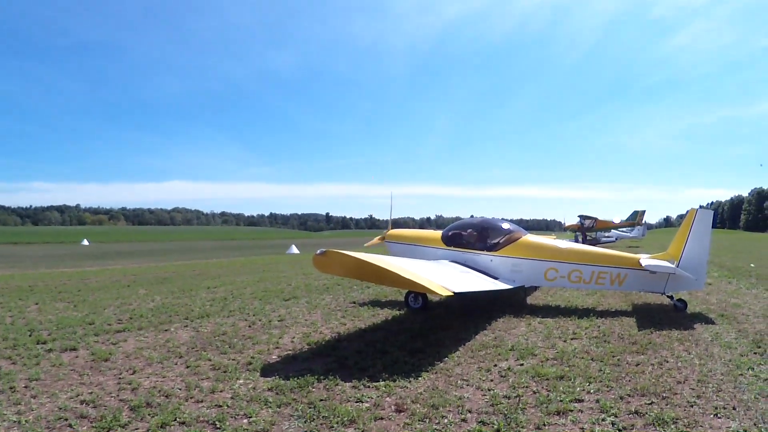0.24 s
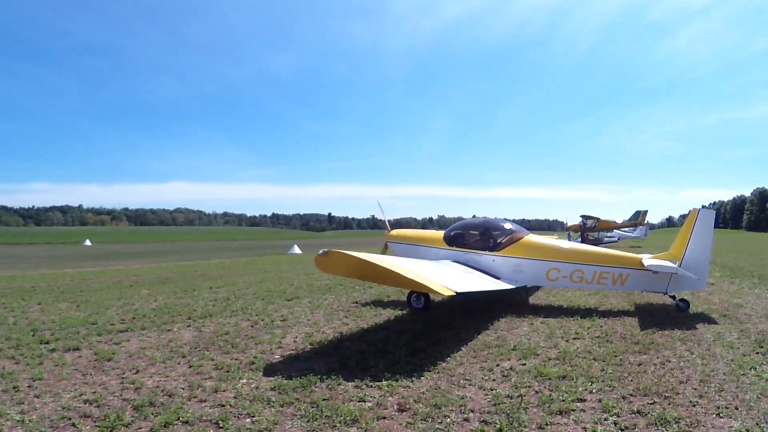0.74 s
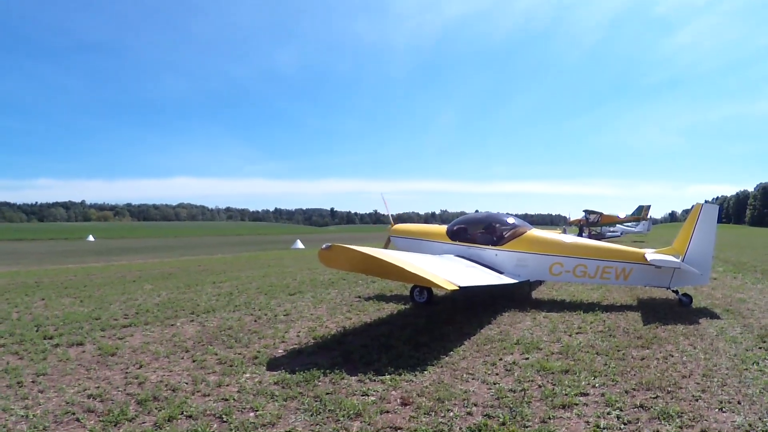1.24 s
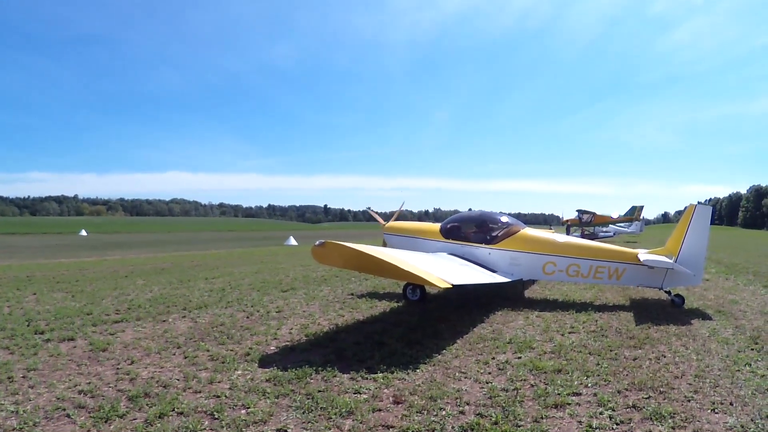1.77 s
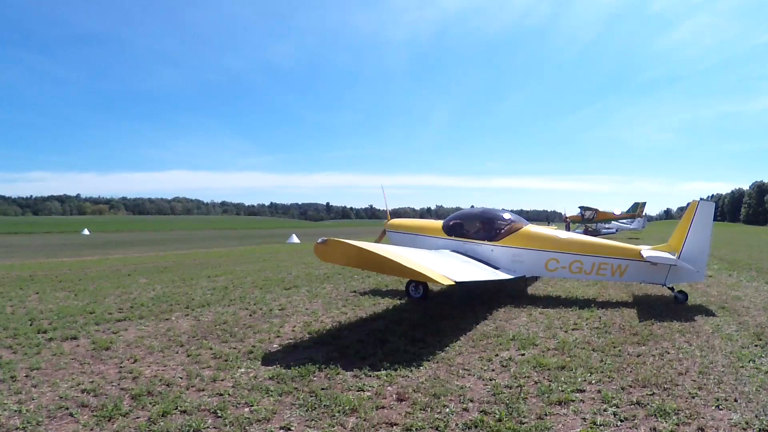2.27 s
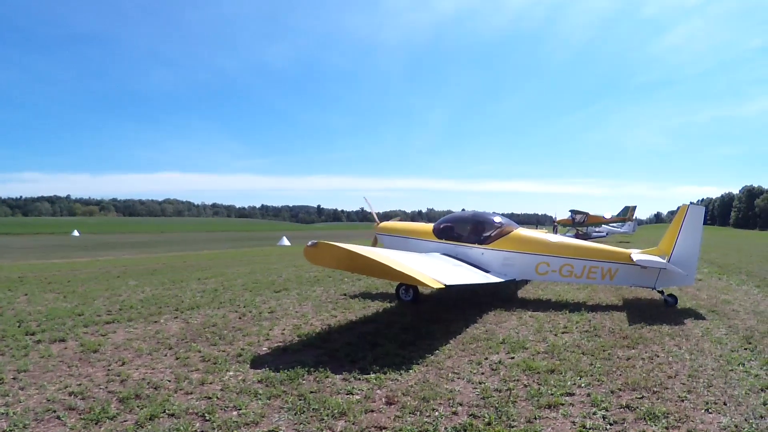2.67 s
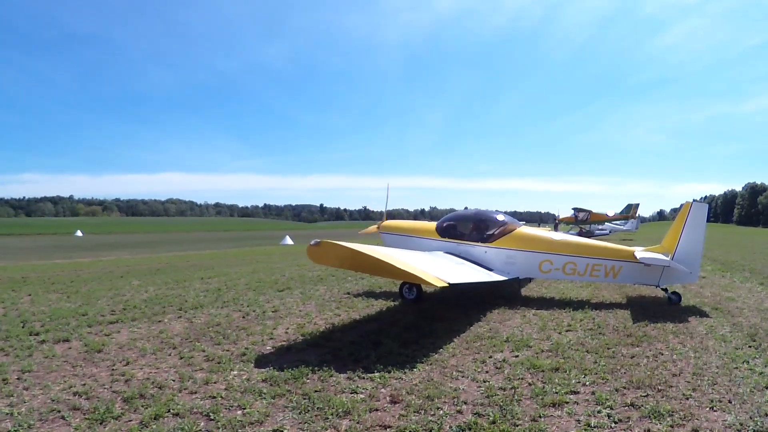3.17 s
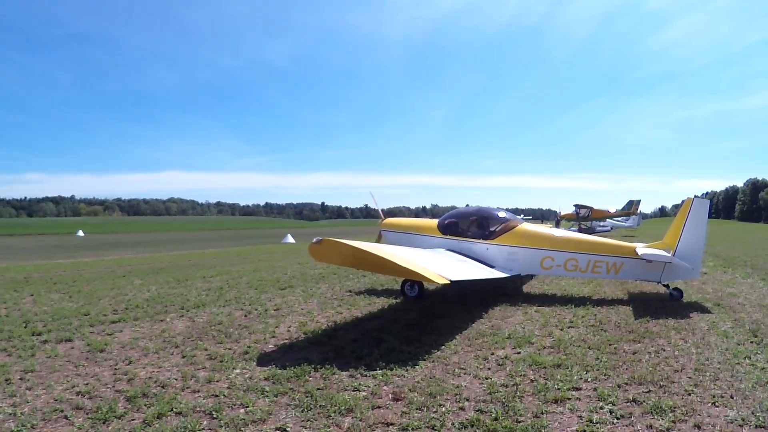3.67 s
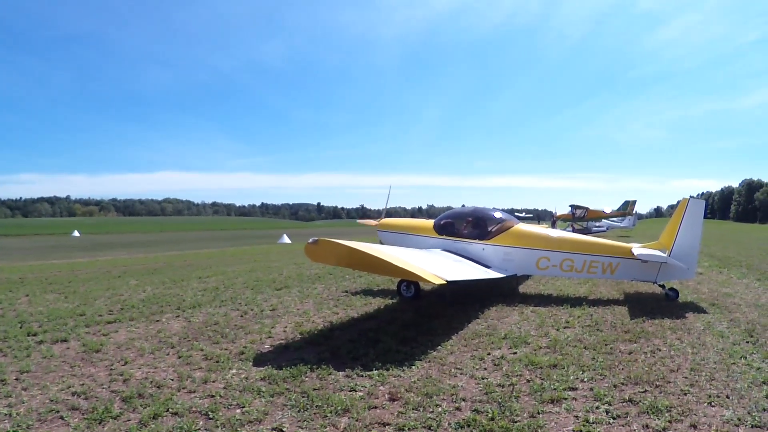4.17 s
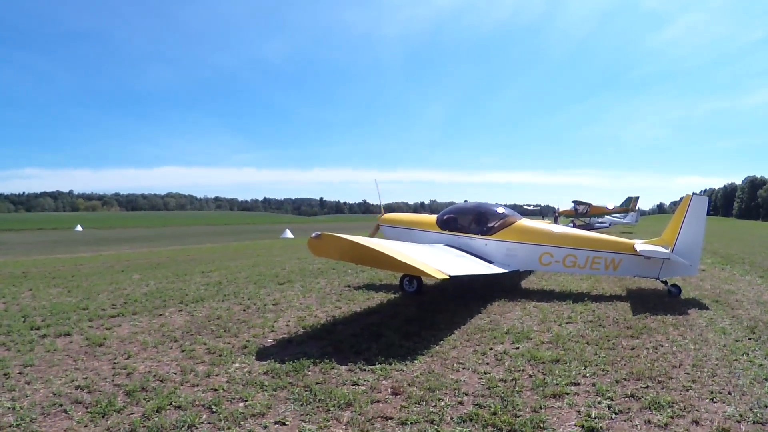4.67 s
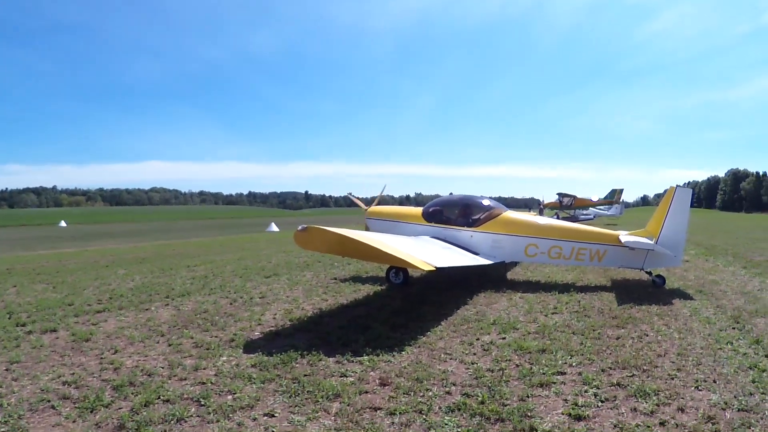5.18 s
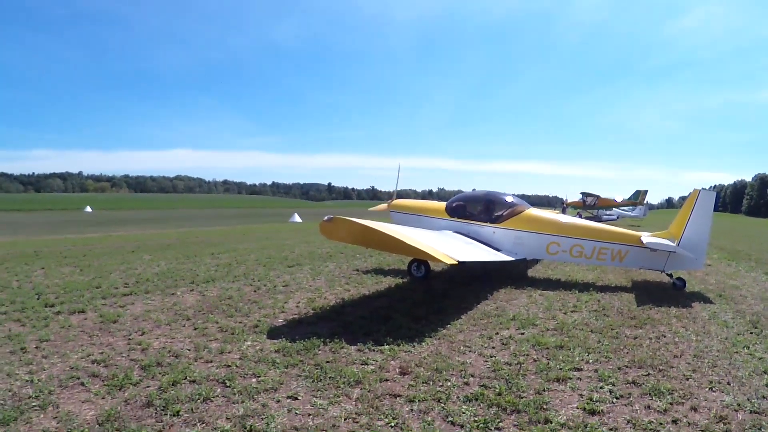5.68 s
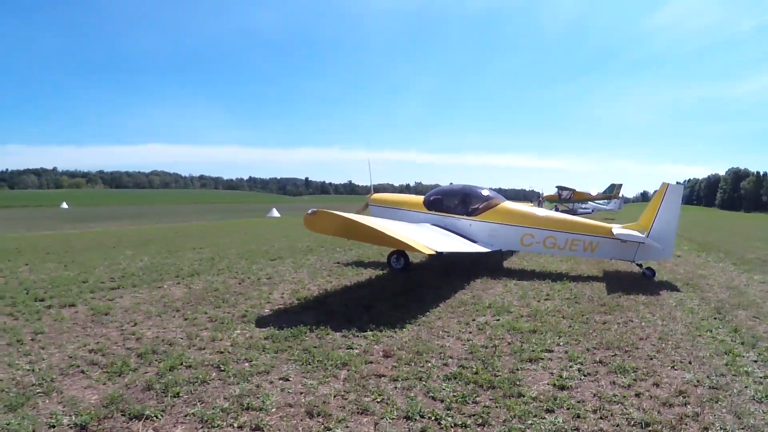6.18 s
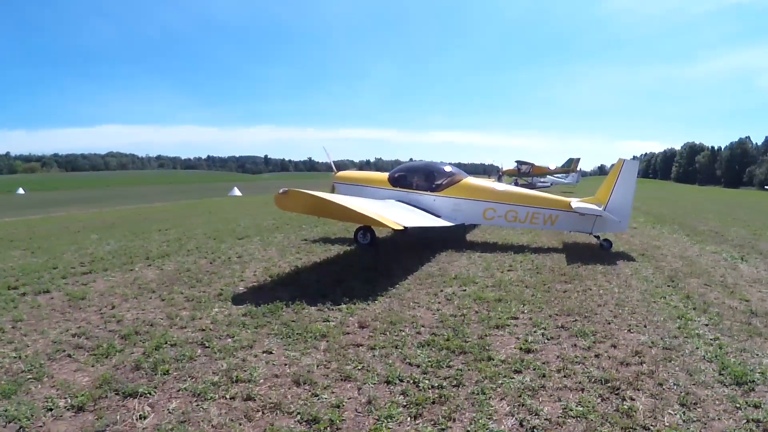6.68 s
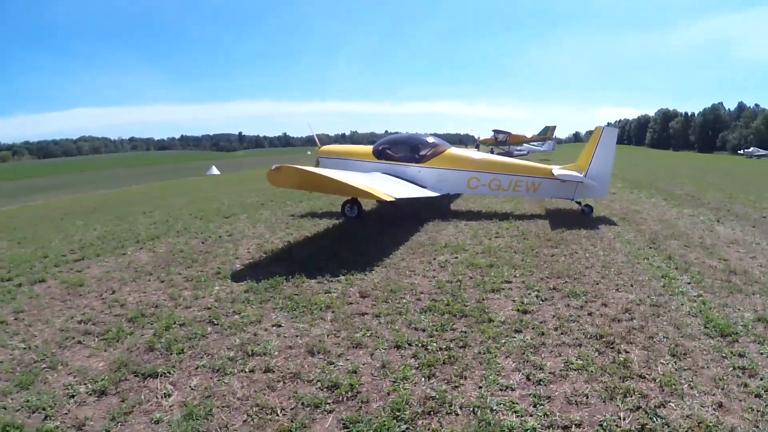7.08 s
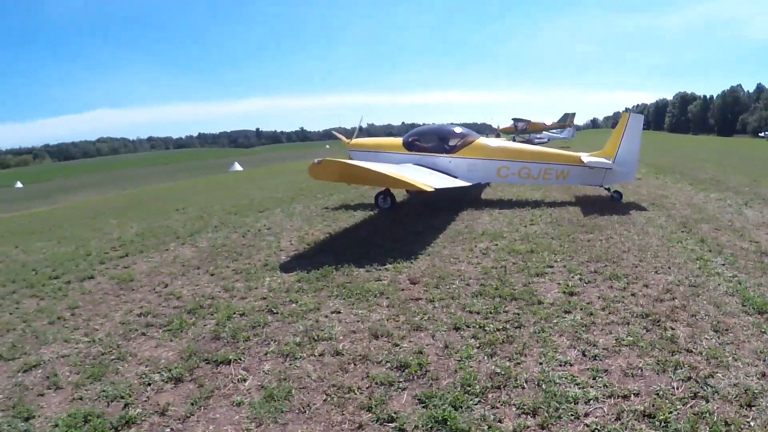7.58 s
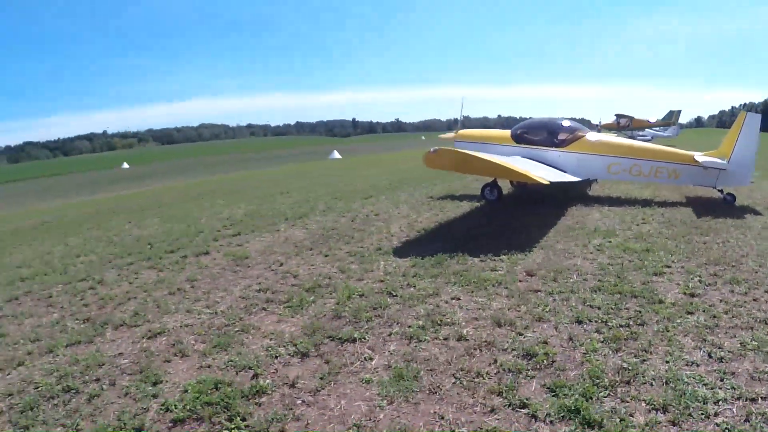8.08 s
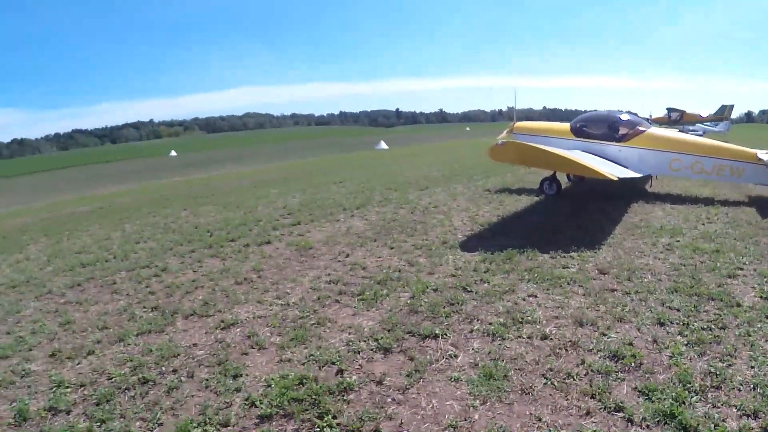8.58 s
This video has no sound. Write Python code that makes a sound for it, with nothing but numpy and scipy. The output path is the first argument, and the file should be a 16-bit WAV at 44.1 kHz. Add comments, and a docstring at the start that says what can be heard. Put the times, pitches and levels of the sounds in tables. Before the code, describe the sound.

A light piston aircraft idles on an open grass field, heard from the side a few metres off, continuous for nearly nine seconds. From 0 s a deep exhaust drone around 67 firings per second is slightly rough and burbling, quickening over the first two seconds to about 71 and then creeping barely higher. A faint far engine beats against it, the throb slowing and fading by about 2 s. Over the drone, propeller blades chop at nearly 50 per second with low puffs, sharp slaps and airy swishes that swell irregularly; fine metallic valve ticks, gear rattle and high fluttering hiss fill the top. Around 5 to 6 s the microphone moves aside and the drone and ticking soften slightly while the low blade thrum grows. From 7.3 s it swings away, the ground echo shifting the swish's colour, and short low wind buffets arrive from about 8 s. The engine never stops.

```python
"""A light aircraft idles on a grass airfield, heard from the side, a few metres off; a second one idles farther back.
The near four-cylinder engine gathers speed just after starting, so its throb against the far one slows and fades.
Firing tones drone, filtered noise bursts tick as valve gear, and a geared three-blade propeller chops the air
as pulses and gated noise. Near the end the microphone swings away, which shifts the ground echo; a little wind
buffets it as low noise."""
import sys
import numpy as np
from scipy import signal
from scipy.fft import rfft, irfft, next_fast_len
from scipy.io import wavfile

SR = 44100
rng = np.random.default_rng(int(sys.argv[2]) if len(sys.argv) > 2 else 0)


def file_out(sig):
    """Save sig as 16-bit WAV at sys.argv[1]."""
    # one column per channel
    cols = np.atleast_2d(sig).T
    # limit, then scale
    lim = np.clip(cols, -1, 1)
    pcm = np.round(lim * 32767).astype(np.int16)
    wavfile.write(sys.argv[1], SR, pcm)


N = 389403


def from_db(db):
    """Decibels to gain."""
    return 10 ** (np.asarray(db) / 20)


def rms_one(x):
    """Scale to unit power."""
    return x / np.sqrt(np.mean(x ** 2) + 1e-20)


def in_time(rows):
    """Each column of a curve, at every sample."""
    time_s, *columns = np.transpose(rows)
    return [np.interp(np.arange(N) / SR, time_s, column) for column in columns]


def at_bins(points):
    """A table over log frequency, read at every bin."""
    hz, value = np.transpose(points)
    bin_hz = np.fft.rfftfreq(next_fast_len(N), 1 / SR)
    return np.interp(np.log(bin_hz + 1), np.log(hz), value)


def shape(x, gain):
    """Filter with one gain per bin."""
    size = next_fast_len(N)
    return irfft(rfft(x, size) * gain, size)[..., :N]


def drift(rate_hz):
    """Slow chance with a spread of 1: noise through two equal poles, drawn every 40 samples."""
    r = np.exp(-2 * np.pi * rate_hz * 40 / SR)
    noise = rng.standard_normal(N // 40 + 2002)
    slow = signal.lfilter([1], [1, -2 * r, r * r], noise)[2000:]  # settled part
    return np.interp(np.arange(N) / 40, np.arange(len(slow)), rms_one(slow))


# Likeness of the two microphone ports. Each row: frequency in Hz, left-right likeness (0-1).
PORT_LIKENESS = [(200, .99), (500, 0.83), (1200, 0.98), (2500, 0.98), (4000, 1), (8000, 0.81),
                 (13000, 0.84)]


def air():
    """White noise at both ports, their likeness varying with frequency."""
    alike = np.clip(at_bins(PORT_LIKENESS), 0, 1)
    mid, side = rng.standard_normal((2, N))
    return shape(mid, np.sqrt(1 + alike)) + shape(side, np.sqrt(1 - alike)) * [[1], [-1]]


def colour(x, spectrum):
    """Filter x by a table of gains in dB; unit power."""
    return rms_one(shape(x, from_db(at_bins(spectrum))))


def resonate(x, hz, width_hz):
    """A resonance with gain 1 on top."""
    r = np.exp(-np.pi * width_hz / SR)
    zeros = np.array([1, 0, -1]) * (1 - r * r) / 2
    poles = [1, -2 * r * np.cos(2 * np.pi * hz / SR), r * r]
    return signal.lfilter(zeros, poles, x)


def ring(force, modes):
    """A metal casing answers a force with its resonances, alternating in sign; unit power."""
    total = 0
    for k, (hz, width_hz, db) in enumerate(modes):
        total += (-1) ** k * from_db(db) * resonate(force, hz, width_hz)
    return rms_one(total)


def pan(x, balance_db):
    """Lean left (positive) or right, keeping the centre level."""
    gains = from_db(balance_db * np.array([[1], [-1]]) / 2)
    return x * gains / gains.mean(axis=0)


def strengths(turns, spread_db):
    """A new random gain for every whole turn."""
    turn = np.floor(turns - np.floor(turns.min())).astype(int)
    return from_db(spread_db * rng.standard_normal(size=2048))[turn]


def swell(turns, width):
    """A rounded peak in the middle of every turn."""
    return 1 / (1 + (np.cos(np.pi * turns) / (np.pi * width)) ** 2)


def bump(at_s, length_s):
    """A smooth rise and fall of height 1; its length is taken at half height."""
    return .5 ** ((2 * (np.arange(N) / SR - at_s) / length_s) ** 2)


def ground_echo(x, delay_ms, strength):
    """The grass returns a late, weaker copy that combs the sound; unit power."""
    now = np.arange(N)
    then = now - delay_ms * SR / 1000
    late = np.array([np.interp(then, now, side) for side in x])
    return rms_one(x + strength * late)


# Near engine speed. Each row: time in s, firings per s.
FIRING_HZ = [(0, 66.95), (.48, 68.08), (.87, 69.67), (1.6, 70.11), (2.25, 71.06), (4.6, 71.45),
             (5.1, 71.63), (7, 72.18), (7.4, 71.85), (8.83, 72.5)]
# Microphone, carried aside, then swung away. Each row: time in s, way aside (0-1), swing (0-1).
MICROPHONE_PATH = [(5.1, 0, 0), (6.2, .9, 0), (7.3, 0.7, 0.2), (8.1, 0.45, 1)]
# Layer levels before each layer's own trim. Each entry: dB at idle, dB more per extra firing per s,
# dB change once aside, dB change once swung away.
LAYER_DB = {"tone": (-11, 0.48, -1.2, -0.5), "overtones": (-18.5, 0.54, -1.63, -1.5),
            "thrum": (-38.5, -0.2, 2.5, 1.5), "swish": (-35, 0.6, -0.94, -0.6),
            "valves": (-37.5, 0.1, -2.3, 1.3), "hiss": (-38, 0.14, -0.9, -0.3)}
IDLE_FIRING_HZ = 71.5


def loudness(layer):
    """A layer's level in dB follows the engine speed and where the microphone is."""
    idle_db, speed_db, aside_db, swing_db = LAYER_DB[layer]
    firing_hz, = in_time(FIRING_HZ)
    aside, swing = in_time(MICROPHONE_PATH)
    return idle_db + speed_db * (firing_hz - IDLE_FIRING_HZ) + aside_db * aside + swing_db * swing


# Exhaust overtones. Each row: multiple of the four-stroke cycle rate, relative level in dB.
EXHAUST_ORDERS = [(3, -20), (5, -38), (6, -3.5), (7, -19), (8, 1.5), (9, -23), (10, -1), (12, -1),
                  (13, -21), (14, -18.5), (15, -22), (16, -5.5), (17, -25), (18, -27), (20, -31), (21, -37),
                  (34, -30.5), (35, -32), (37, -25), (47, -28)]
# Burble spectrum. Each row: frequency in Hz, gain in dB.
BURBLE_SPECTRUM = [(25, -23), (50, -23), (100, -1.5), (150, -4), (250, -2.5), (330, -2.5), (420, -29),
                   (700, -30.5)]
# Cold cylinders fire unevenly, then settle: spread of strength (0-1) cold and warm.
COLD_STUMBLE, WARM_STUMBLE, SETTLE_S = 0.11, 0.029, 1.6
# Left minus right, and its change once swung away.
EXHAUST_BALANCE_DB, SWING_BALANCE_DB = -2.8, -3.0


def exhaust(cycle, muffler_hz=108, muffler_width_hz=25, waver=0.066, burble_db=-15, tone_lead_rad=0.45):
    """Firing tone and overtones; uneven firings make them waver and burble."""
    tone_db, overtone_db = loudness("tone"), loudness("overtones")
    _, swing = in_time(MICROPHONE_PATH)
    balance_db = EXHAUST_BALANCE_DB + SWING_BALANCE_DB * swing
    stumble = WARM_STUMBLE + (COLD_STUMBLE - WARM_STUMBLE) * np.exp(-np.arange(N) / SR / SETTLE_S)
    mean_cycle_hz = cycle[-1] * SR / N
    cycle = cycle - .024  # the pulses need time to run down the pipe
    overtones = 0
    for order, db in EXHAUST_ORDERS:
        order_hz = order * mean_cycle_hz
        # above its resonance the muffler swings against the pulses
        lag_rad = np.arctan2(order_hz * muffler_width_hz, muffler_hz ** 2 - order_hz ** 2)
        if order % 4 > 0:
            lag_rad -= np.pi / 2  # unequal pipes add the orders in between, a quarter turn ahead
        strength = from_db(db) * (1 + (waver + stumble) * drift(6.8))
        overtones += strength * np.cos(2 * np.pi * order * cycle - lag_rad + waver * drift(8.5))
    firing_rad = 2 * np.pi * 4 * cycle
    tone = np.sqrt(2) * np.cos(firing_rad + tone_lead_rad) * (1 + stumble / 2 * drift(19))
    burble = colour(rng.standard_normal(N) * swell(4 * cycle + .5, width=.3), BURBLE_SPECTRUM)
    rich = rms_one(overtones) + from_db(burble_db) * burble
    return pan(from_db(tone_db) * tone + from_db(overtone_db + 0.7) * rich, balance_db)


# Valves closing. Each row: share of the cycle, relative level in dB.
VALVE_CLOSINGS = [(.0, 6), (0.253, 6), (0.491, 1), (0.761, -24)]
# Cylinder head rings. Each row: frequency in Hz, width in Hz, relative level in dB.
HEAD_RINGS = [(3440, 430, 5), (4100, 270, -5), (4900, 150, 1.5), (6600, 590, -7), (8330, 660, 1)]
# Gearbox rings. Each row: frequency in Hz, width in Hz, relative level in dB.
GEARBOX_RINGS = [(2970, 150, -4), (3164, 56, 1), (3670, 420, -7)]


def valve_gear(cycle, level_db, echo_ms, decay_cycles=0.024, clatter=0.46, valve_db=-4, gear_db=-3):
    """Valves snap shut in turn and ring the heads; the gears rattle twice a cycle and make their housing whirr."""
    knocks = 0
    for at, db in VALVE_CLOSINGS:
        since = (cycle - at) % 1
        knocks += from_db(db) * strengths(cycle - at, spread_db=4.0) * np.exp(-since / decay_cycles)
    valves = ring(air() * (knocks + clatter), HEAD_RINGS)
    rattle = swell(2 * cycle + 0.64, width=0.24) * strengths(2 * cycle + 0.5, spread_db=2.0)
    gears = ring(air() * (0.23 + rattle), GEARBOX_RINGS)
    metal = from_db(valve_db) * valves + from_db(gear_db) * gears
    return pan(from_db(level_db - 0.5) * ground_echo(metal, echo_ms, strength=0.31), balance_db=-0.5)


# Propeller tones. Each row: multiple of the blade rate, level in dB.
BLADE_HARMONICS = [(1, -39.5), (2, -35), (3, -39.5), (4, -41), (5, -40), (6, -48.5)]


def blade_tones(blade, waver=0.44):
    """Each blade pushes a pressure pulse; gusty inflow makes its harmonics waver."""
    tones = 0
    for order, db in BLADE_HARMONICS:
        strength = from_db(db) * (1 + waver * drift(5))
        tones += strength * np.sin(2 * np.pi * order * (blade - .5) + waver * drift(3.0))
    return np.sqrt(2) * tones


# Eddies drawn through the propeller. Each row: time in s, length in s, thrum swell in dB, swish swell in dB.
INFLOW_EDDIES = [(.5, 0.15, 4, 2.5), (1.126, 0.21, 3, 3), (1.442, 0.23, 4, .3), (2.074, .5, 1, 3),
                 (2.818, 0.19, 0.5, 1.6), (3.53, 0.28, 3, -1), (4.44, 0.49, 3, 0), (5.61, 0.64, 3, 2),
                 (6.595, 0.42, -1, 2), (7.6, 0.45, 0.5, 3), (8.147, 0.23, 2.5, 2), (8.75, .35, 3.5, 2)]


def inflow(unrest_db=1.0):
    """How many dB the large eddies and the small unrest of the air add to the thrum and to the swish."""
    swells = 0
    for at_s, length_s, thrum_db, swish_db in INFLOW_EDDIES:
        swells += bump(at_s, length_s) * np.array([[thrum_db], [swish_db]])
    return swells + unrest_db * np.array([drift(5.4), drift(5)])


# Low puff spectrum. Each row: frequency in Hz, gain in dB.
THRUM_SPECTRUM = [(230, -10.5), (330, 5.5), (450, 3), (650, 3), (740, -7), (1000, -28.5)]
# Swish spectrum. Each row: frequency in Hz, gain in dB.
SWISH_SPECTRUM = [(500, -44), (780, 3.5), (900, 0.5), (1200, 2), (1600, -1.5), (2000, -2), (2600, -10.5),
                  (4000, -14.5), (9000, -24), (16000, -33)]


def blade_chop(blade, thrum_db, swish_db, echo_ms, slap_db=-.5, crack_db=-9.5, echo_strength=0.36):
    """Every blade that sweeps towards the listener throws a sharp pressure pulse, a low puff and a swish."""
    passing = blade + .011 * drift(8)
    slap = swell(passing + .06, width=.02) * strengths(blade, spread_db=1.2)
    crack = swell(passing, width=.004) * strengths(blade, spread_db=1.0)
    puff = air() * (0.54 + swell(blade + .06, width=0.18))
    rush = air() * (.36 + swell(blade, width=.13) * strengths(blade, spread_db=.9))
    thrum = rms_one(colour(puff, THRUM_SPECTRUM) + from_db(slap_db) * colour(slap, THRUM_SPECTRUM))
    swish = colour(rush, SWISH_SPECTRUM) + from_db(crack_db) * colour(crack, SWISH_SPECTRUM)
    swish = ground_echo(swish, echo_ms, echo_strength)
    low = pan(from_db(thrum_db + 1.5) * thrum, balance_db=-2.5)
    high = pan(from_db(swish_db + 0.4) * swish, balance_db=-0.8)
    return low + high


# Blade tip hiss spectrum. Each row: frequency in Hz, gain in dB.
HISS_SPECTRUM = [(1500, 3.5), (2300, 2.5), (3100, 2.5), (3900, -2), (5000, 0.5), (5600, -7.5), (7200, 0),
                 (8600, 0), (9600, -1), (12300, -1), (14000, -5), (15600, -34.5)]


def hiss(blade, level_db, flutter=0.88, whip=.8, shimmer_db=.5):
    """Air tears off the blade tips; one of the three blades whips louder on each turn of the propeller."""
    turn = blade / 3
    one_blade = swell(turn + .44, width=.04)
    uneven = strengths(blade, spread_db=3.0)
    gate = 1.87 + flutter * swell(blade + 0.16, width=0.1) * uneven + whip * one_blade
    gain = from_db(level_db + 3.5 + shimmer_db * drift(11))
    return pan(gain * colour(air() * gate, HISS_SPECTRUM), balance_db=0.2)


# Far exhaust tones. Each row: multiple of the far firing rate, relative level in dB.
FAR_EXHAUST_TONES = [(1, -32.5), (2, -29.5), (3, -44)]
# Far aircraft loudness. Each row: time in s, gain in dB.
FAR_LOUDNESS_DB = [(0, 3), (1.15, 2), (1.7, -5), (8.83, -6)]
FAR_FIRING_HZ = 72.1


def far_aircraft():
    """Only the lowest exhaust tones carry this far; they beat against those of the near engine."""
    level_db, = in_time(FAR_LOUDNESS_DB)
    firings = FAR_FIRING_HZ * np.arange(N) / SR - .05
    tones = sum(from_db(db) * np.cos(2 * np.pi * k * firings) for k, db in FAR_EXHAUST_TONES)
    return pan(np.sqrt(2) * from_db(level_db) * tones, balance_db=-1.5)


# Puffs of wind on the microphone. Each row: time in s, length in s, level in dB.
WIND_PUFFS = [(0, .12, -34), (4.58, .2, -40), (6.55, .3, -43), (8.02, .12, -34), (8.32, .1, -27),
              (8.52, .12, -29), (8.82, .1, -30)]
BREEZE_DB = -51


def wind(low_hz=22, corner_hz=44):
    """Lumpy pressure on the microphone ports: a faint breeze and a few puffs."""
    pressure = from_db(BREEZE_DB)
    for at_s, length_s, db in WIND_PUFFS:
        pressure = pressure + from_db(db) * bump(at_s, length_s)
    eddies = rng.standard_normal(N) + .3 * rng.standard_normal((2, N))  # shared plus separate
    band = signal.butter(2, [low_hz, corner_hz], "band", fs=SR, output="sos")
    rumble = signal.sosfilt(band, eddies)
    return pan(pressure * rms_one(rumble), balance_db=-3.0)


# Ground echo. Each row: time in s, propeller delay in ms, engine delay in ms.
GROUND_DELAYS_MS = [(0, 0.63, 0.68), (5, 0.71, 0.64), (6.6, .76, 0.584), (7.5, 0.69, 0.74),
                    (7.9, 0.62, 0.55), (8.3, 0.37, 0.5), (8.83, 0.42, 0.66)]
BLADES_PER_CYCLE = 2.64


def scene():
    """One crankshaft drives the near aircraft: four firings a cycle, and the propeller through its gearbox."""
    firing_hz, = in_time(FIRING_HZ)
    cycle = np.cumsum(firing_hz) / (4 * SR) - .085
    blade = BLADES_PER_CYCLE * cycle - .1
    eddy_thrum_db, eddy_swish_db = inflow()
    propeller_echo_ms, engine_echo_ms = in_time(GROUND_DELAYS_MS)
    engine = exhaust(cycle) + valve_gear(cycle, loudness("valves"), engine_echo_ms)
    thrum_db = loudness("thrum") + eddy_thrum_db
    swish_db = loudness("swish") + eddy_swish_db
    chop = blade_chop(blade, thrum_db, swish_db, propeller_echo_ms)
    propeller = blade_tones(blade) + chop + hiss(blade, loudness("hiss"))
    return engine + propeller + far_aircraft() + wind()


# Phase between the microphone ports. Each row: frequency in Hz, radians by which the left leads.
# On the log axis 0 Hz is infinitely far down, so the second row's phase holds below it.
PORT_LEAD_RAD = [(0, 0), (430, 0.15), (690, 0.7), (1030, -0.54), (1460, 0.0055), (5770, -0.3), (6200, 0.0),
                 (6980, -0.093), (9470, 0.058), (11600, -0.2), (15200, -0.68)]
CUTOFF_HZ = 15600


def record(dry):
    """The two ports hear slightly out of step; the top is cut steeply."""
    lead_rad = at_bins(PORT_LEAD_RAD) * np.array([[1], [-1]]) / 2
    ports = shape(dry, np.exp(1j * lead_rad))
    steep = signal.ellip(12, .1, 90, CUTOFF_HZ, fs=SR, output="sos")
    return signal.sosfilt(steep, ports)


dry = scene()
out = record(dry)
file_out(out)
```